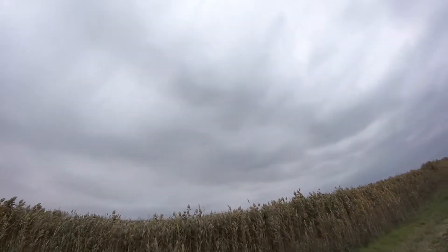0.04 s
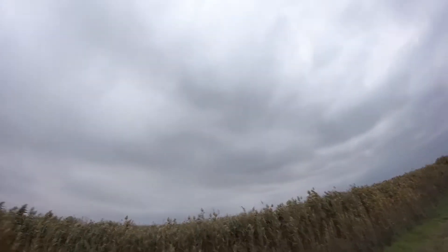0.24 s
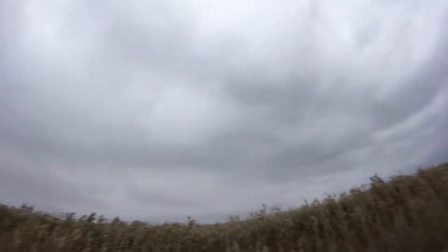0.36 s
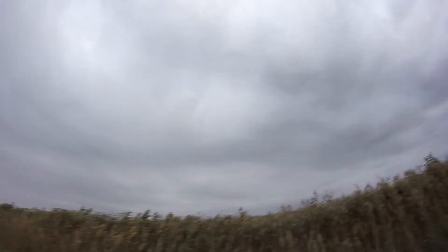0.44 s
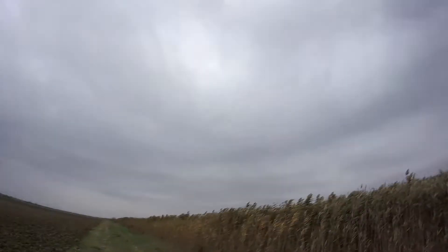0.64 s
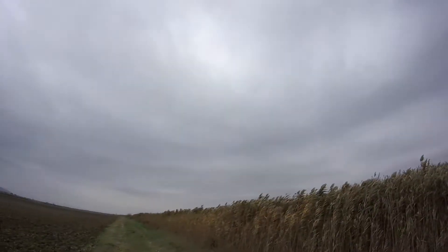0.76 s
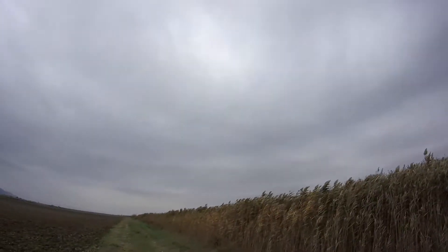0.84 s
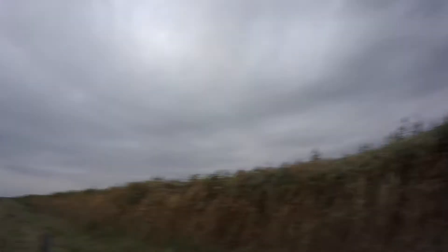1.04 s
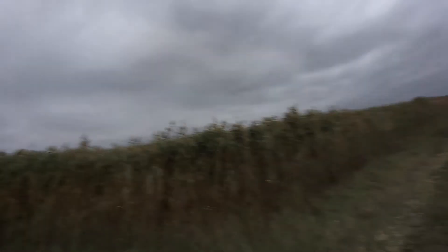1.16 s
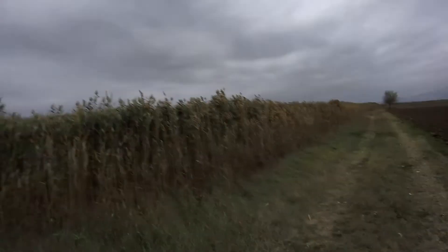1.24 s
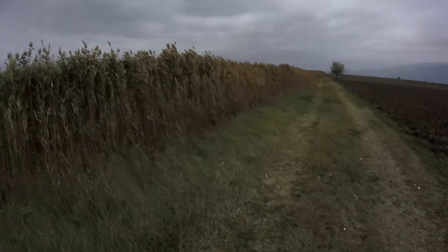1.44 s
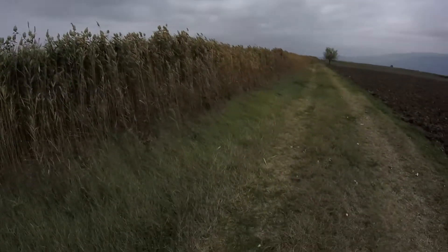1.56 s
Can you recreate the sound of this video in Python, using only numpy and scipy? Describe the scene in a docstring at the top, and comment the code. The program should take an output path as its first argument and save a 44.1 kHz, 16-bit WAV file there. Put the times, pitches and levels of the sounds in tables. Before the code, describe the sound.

Three soft footsteps on a grassy track come through as deep, dull thumps on a carried camera. Its plastic mount faintly rubs and clicks with the steps, over a low wind rumble and steady outdoor hiss.

```python
"""Three soft steps on a grassy track beside reeds, heard from a camera the walker carries.
From the start, light wind rumbles on the camera's housing over a steady, dull outdoor hiss.
The first step jolts the camera into a deep, short wobble; its plastic mount rubs, knocks and squeaks,
then the housing ticks. The second step, near 0.7 s, comes with rubbing but no knocks.
A soft puff of wind follows, and the third step lands near 1.3 s among more rubs and knocks."""
import sys
import numpy as np
from scipy import signal
from scipy.fft import rfft, irfft
from scipy.io import wavfile

SR = 44100
rng = np.random.default_rng(int(sys.argv[2]) if len(sys.argv) > 2 else 0)


def inscribe(sig):
    """Save sig as 16-bit PCM at rate SR to the path in sys.argv[1].

    A 1-D sig is mono; a 2-D sig holds one channel per row.
    Samples are clipped to [-1, 1] before scaling.
    """
    pcm = np.round(np.clip(np.atleast_2d(sig).T, -1, 1) * 32767)
    wavfile.write(sys.argv[1], SR, pcm.astype(np.int16))


N = 70560  # 1.6 s


def undb(db):
    """Turn decibels into a number to multiply by."""
    return 10 ** (np.asarray(db) / 20)


def unit(x):
    """Scale a sound to an average strength (rms) of 1."""
    return x / np.sqrt(np.mean(x ** 2))


def seconds():
    """The time of every sample."""
    return np.arange(N) / SR


def noise(points):
    """Noise of strength 1 whose tone follows a curve of (frequency [Hz], level [dB]) points."""
    hz, db = np.array(points).T
    freqs = np.maximum(np.fft.rfftfreq(N, 1 / SR), 1)
    curve = undb(np.interp(np.log(freqs), np.log(hz), db))
    return unit(irfft(rfft(rng.standard_normal(N)) * curve, N))


def resonate(x, hz, width):
    """Keep the part of a sound near one pitch, filtering twice for a sharper cut."""
    b, a = signal.iirpeak(hz, hz / width, fs=SR)
    return signal.lfilter(b, a, signal.lfilter(b, a, x))


def noise_band(hz, width):
    """Noise around one pitch; the width is in Hz too."""
    return resonate(rng.standard_normal(N), hz, width)


def burst(x, at, half):
    """Fade a sound in to strength 1 and out again, given its middle and half length in seconds."""
    swell = np.exp(-((seconds() - at) / half) ** 2)
    return swell * x / np.sqrt(np.average(x ** 2, weights=swell ** 2))


def ring(t, hz, fade_s):
    """A struck tone that dies away by 60 dB in fade_s seconds."""
    return np.exp(-np.log(1000) * t / fade_s) * np.sin(2 * np.pi * hz * t)


def breeze():
    """Wind pushes on the housing with a low rumble and one soft puff, over the hiss of the open field."""
    # tone of the outdoor hiss: (frequency [Hz], relative level [dB])
    hiss_tone = [(60, -5), (130, 1), (250, -3.5), (420, -7), (900, -12.5), (1550, -14.5), (2000, -16),
                 (2800, -18), (3600, -21), (5000, -24.5), (5900, -26), (6350, -24.5), (6900, -27.5),
                 (8500, -31), (11000, -36), (15000, -43.5)]
    # tone of the wind on the housing: (frequency [Hz], relative level [dB])
    wind_tone = [(10, -25), (22, -14), (32, 4.5), (52, -4), (70, -13), (100, -27), (200, -59.5),
                 (600, -104)]
    gusts = np.interp(np.arange(N), np.linspace(0, N, 12), rng.standard_normal(12))  # slow random drift
    rumble = noise(wind_tone) * undb(-51 + 3.5 * gusts)
    puff = undb(-50.5) * burst(noise_band(hz=58.3, width=43), at=1.085, half=0.026)
    hiss_db = -55.5 + 0.4 * (seconds() - N / SR / 2)  # creeps up 0.4 dB a second
    return rumble + puff + noise(hiss_tone) * undb(hiss_db)


def mount_squeak():
    """The mount catches and sings for a moment at one pitch."""
    return undb(-56.5) * burst(noise_band(hz=2656, width=200), at=0.2155, half=0.0042)


def housing_tick():
    """The plastic housing gives a tiny crack and rings for a few milliseconds, with no bass."""
    # tick of the housing: (time [s], level [dB], treble boost [dB per octave])
    ticks = [(0.2551, -37.5, 2.5)]
    # tones the housing rings at: (pitch [Hz], relative level [dB], time to fade by 60 dB [s])
    tones = [(1680, -3.5, 0.012), (2460, 2.5, 0.0082), (2760, -0.5, 0.0065), (3560, -5.5, 0.013),
             (3900, -11, 0.009), (6950, -15.5, 0.01), (8000, -9, 0.0046), (8400, -10, 0.0051)]
    pivot_hz = tones[1][0]  # the boost leaves this tone as it is
    rise_s, crack_s = 0.00028, 0.0007
    out = np.zeros(N)
    for at, db, boost in ticks:
        t = np.maximum(seconds() - at, 0)
        ringing = sum(undb(tone_db + boost * np.log2(hz / pivot_hz)) * ring(t, hz, fade_s)
                      for hz, tone_db, fade_s in tones)
        crack = undb(-16) * np.exp(-t / crack_s) * rng.standard_normal(N)
        out += undb(db) * (1 - np.exp(-t / rise_s)) * (ringing + crack)
    bass_cut = signal.butter(4, 1180, "highpass", fs=SR, output="sos")
    return signal.sosfilt(bass_cut, out)


def mount_rubs():
    """As the weight shifts, many tiny slips make the plastic mount ring."""
    # rubs of the mount: (middle time [s], half length [s], level [dB], boost of the upper tones [dB])
    rubs = [(0.132, 0.0039, -54.5, 3), (0.147, 0.0096, -54, -1.5), (0.328, 0.011, -65, -12),
            (0.619, 0.0054, -60, 0), (0.681, 0.039, -61.5, 4), (0.742, .016, -56, 7.5),
            (1.203, 0.071, -62, 1.5), (1.278, 0.014, -59, 3), (1.337, 0.025, -55, 1),
            (1.387, 0.0061, -56.5, 4), (1.491, 0.05, -60, 1), (1.59, 0.0079, -60, 4)]
    # tones the mount rings at, lowest first: (pitch [Hz], width [Hz], relative level [dB])
    tones = [(1530, 430, 12), (2270, 530, 9.5), (2642, 440, 8.5)]
    slips_per_s, scatter_db = 4100, 3.5
    slipping = rng.random(N) < slips_per_s / SR
    slips = slipping * rng.choice([-1, 1], N) * undb(scatter_db * rng.standard_normal(N))
    lowest, *upper = [undb(db) * unit(resonate(slips, hz, width)) for hz, width, db in tones]
    return sum(undb(db) * burst(lowest + undb(boost) * sum(upper), at, half)
               for at, half, db, boost in rubs)


def mount_knocks():
    """A gap in the loose mount closes with a small knock that dies quickly."""
    # knocks of the mount: (time [s], level [dB], pitch [Hz], time to fade by 60 dB [s])
    knocks = [(0.13, -49, 2970, 0.008), (0.1468, -39.5, 2580, 0.0074), (1.209, -39.5, 2640, 0.008),
              (1.2302, -40.5, 2420, 0.0081), (1.2689, -42.5, 2600, .009), (1.4015, -33.5, 1670, 0.0048)]
    rise_s = 0.00032
    out = np.zeros(N)
    for at, db, hz, fade_s in knocks:
        t = np.maximum(seconds() - at, 0)
        out += undb(db) * (1 - np.exp(-t / rise_s)) * ring(t, hz, fade_s)
    return out


def footsteps():
    """Each jolt is a dull thud inside a short, deep wobble, and sets the camera swaying."""
    # jolts from the steps and their rebounds:
    # (peak time [s], peak level [dB], wobble pitch [Hz], rise [s], fall [s], thud relative to peak [dB])
    jolts = [(0.135, -16.5, 24.6, 0.033, 0.03, -21), (0.196, -29, 23.3, 0.017, 0.028, -26.5),
             (0.687, -20, 28, 0.024, 0.025, -25.5), (1.289, -23, 22.5, 0.045, 0.046, -24),
             (1.448, -36.5, 23.8, 0.052, 0.072, -33)]
    sway_db, sway_delay_s = -20, 0.011  # both relative to the jolt's peak
    sway_half_s, thud_half_s = 0.098, 0.022
    wobble, sway_level, thud_level = np.zeros((3, N))
    for at, db, hz, rise, fall, thud_db in jolts:
        t = seconds() - at
        swell = np.exp(-(t / np.where(t < 0, rise, fall)) ** 2)
        wobble += undb(db) * swell * np.cos(2 * np.pi * hz * t)
        sway_level += undb(db + sway_db) * np.exp(-((t - sway_delay_s) / sway_half_s) ** 2)
        thud_level += undb(db + thud_db) * np.exp(-(t / thud_half_s) ** 2)
    thud = thud_level * unit(noise_band(hz=55.6, width=24.5))
    sway = sway_level * unit(noise_band(hz=28.2, width=12.8))
    return wobble + thud + sway


def scene():
    """Add the steps, the plastic noises and the breeze into one channel."""
    mix = footsteps() + mount_rubs() + mount_knocks() + mount_squeak() + housing_tick() + breeze()
    return mix[None, :]


def record(dry):
    """Cut away the very highest treble."""
    top_hz = 15160
    return signal.sosfilt(signal.ellip(10, 0.2, 70, top_hz, fs=SR, output="sos"), dry)


dry = scene()
out = record(dry)
inscribe(out)
```